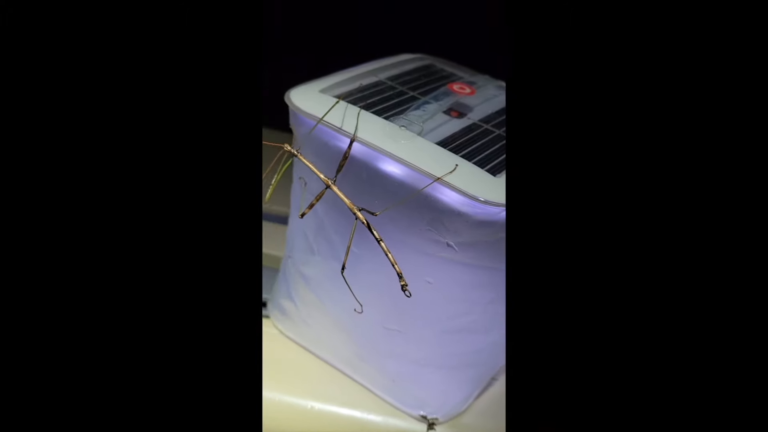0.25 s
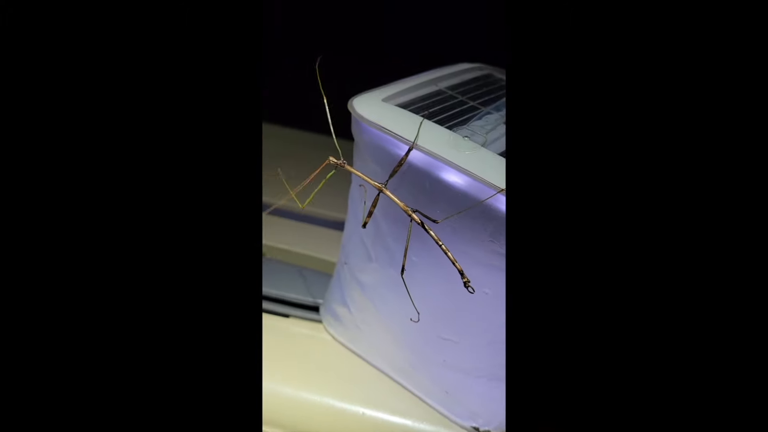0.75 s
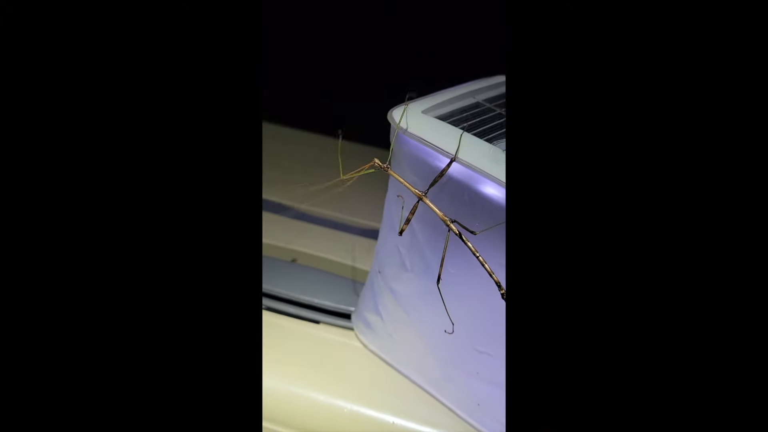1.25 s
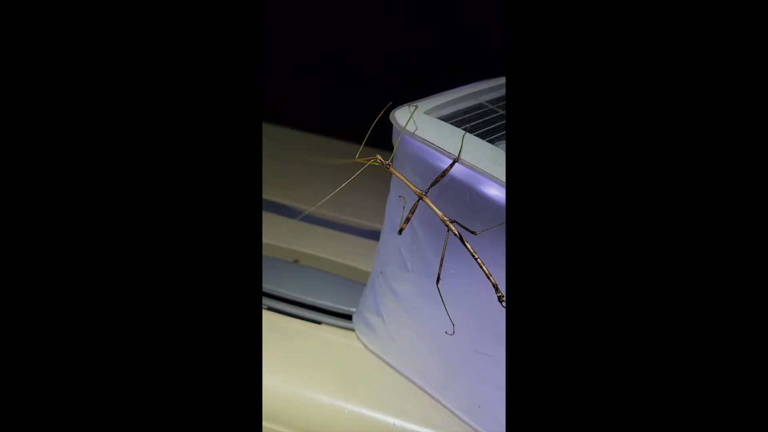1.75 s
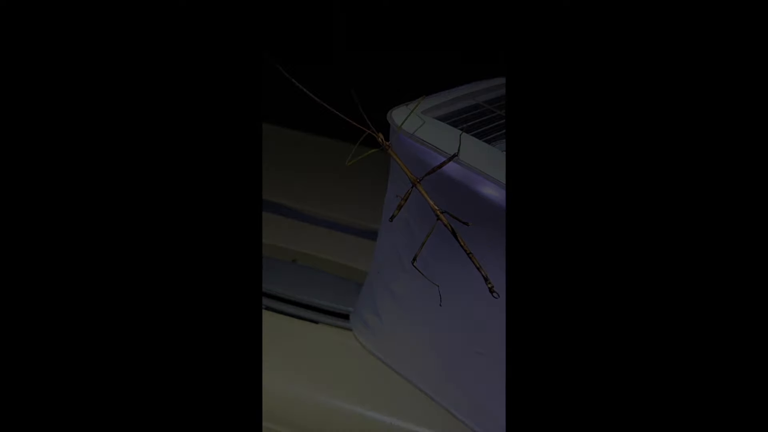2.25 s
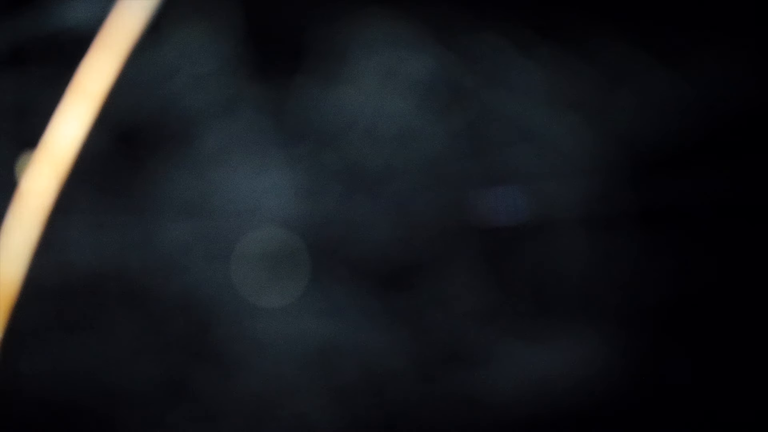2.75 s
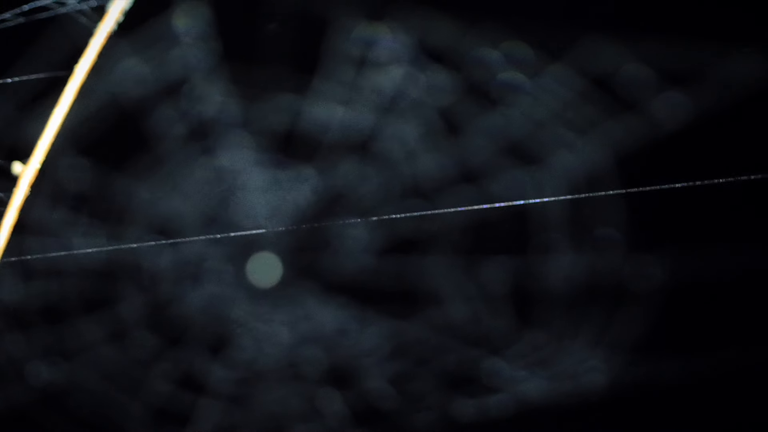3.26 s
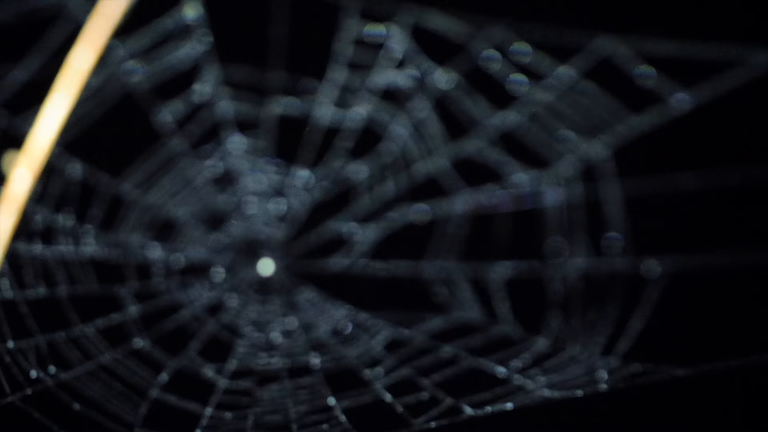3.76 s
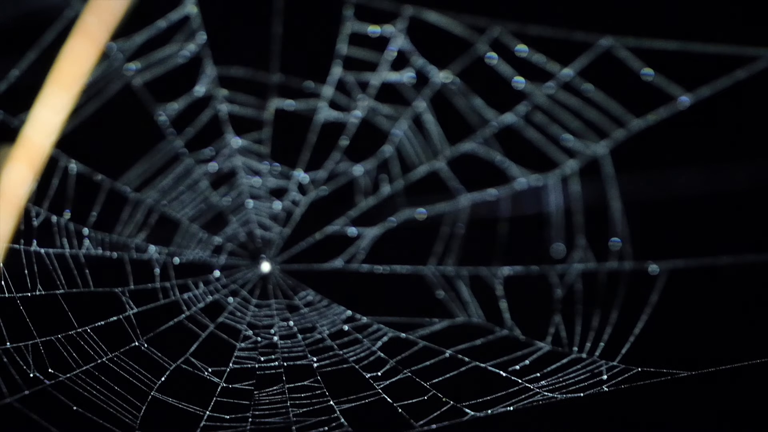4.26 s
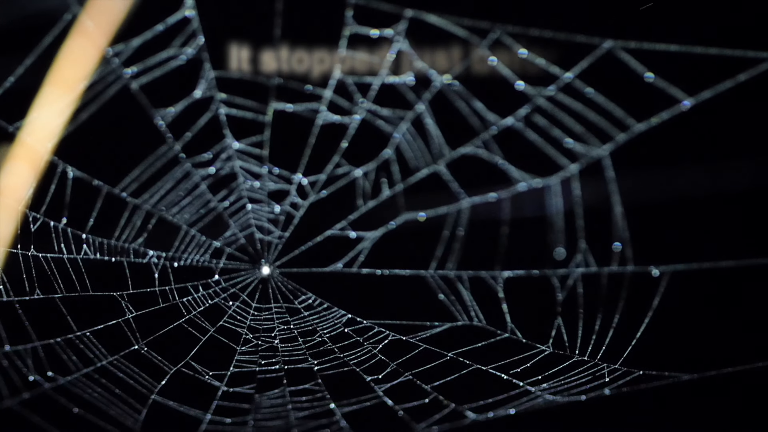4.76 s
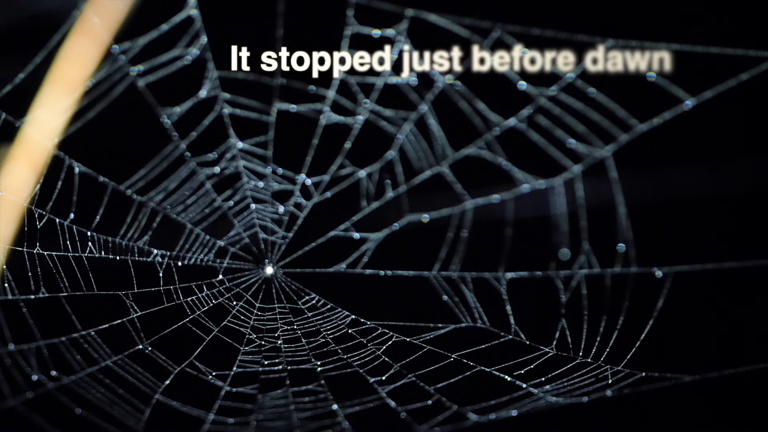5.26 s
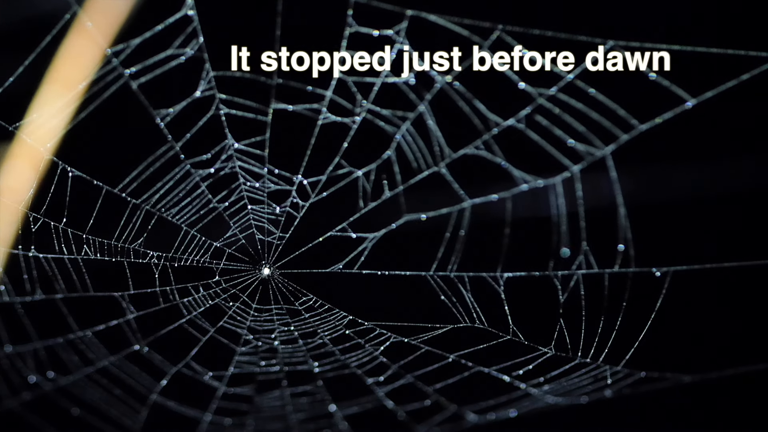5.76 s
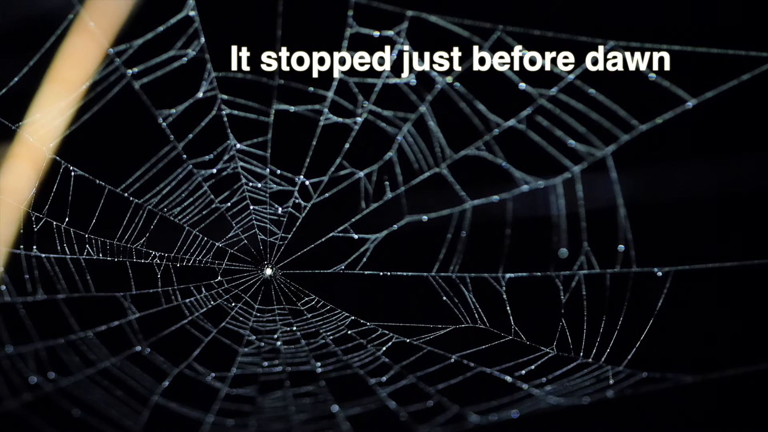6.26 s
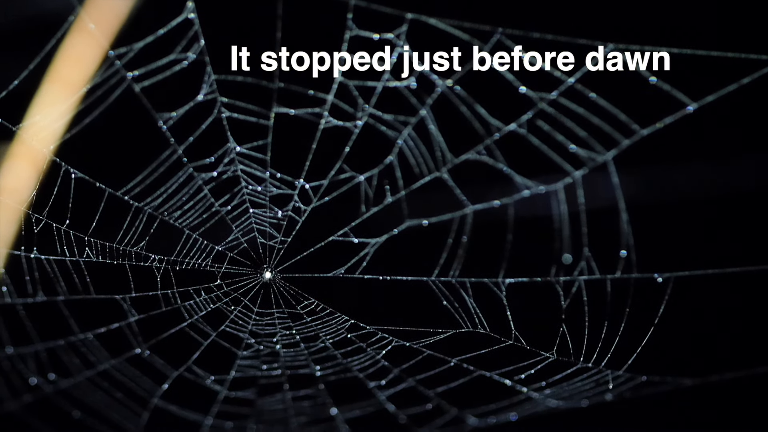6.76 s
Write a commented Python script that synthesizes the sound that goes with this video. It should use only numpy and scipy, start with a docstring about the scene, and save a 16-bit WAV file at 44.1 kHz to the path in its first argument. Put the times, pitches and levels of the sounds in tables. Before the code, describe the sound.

Inside a tent at night, heavy rain drums on the cloth, a dense muffled roar with big drops thudding overhead and small bright splashes. It starts loud, fades steadily from about one second and is gone by three and a half. A distant, high, steady insect chorus is left, very quiet, with faint air and soft drips. Close, wide stereo rain; centred night background.

```python
"""Heavy rain drums on a tent at night, heard from inside by two microphone ports, and fades away.
Random drops and placed thuds excite a cloth filter; splashes are short bursts of bright noise.
A far chorus of night insects, built of many short tones, comes up under it and stays, alike in both
ports, with faint air of filtered noise, a few soft drips (a push and two noise puffs) and a low hum
of narrow-band noise that comes and goes."""
import sys
import numpy as np
from scipy import signal
from scipy.fft import rfft, irfft, next_fast_len
from scipy.io import wavfile
from scipy.ndimage import uniform_filter1d, map_coordinates

SR = 44100
rng = np.random.default_rng(int(sys.argv[2]) if len(sys.argv) > 2 else 0)


def store_wav(level_fs):
    """Save 16-bit WAV to argv[1]."""
    pcm = np.round(np.clip(np.atleast_2d(level_fs), -1, 1) * 32767)
    wavfile.write(sys.argv[1], SR, pcm.T.astype(np.int16))


N = 309141
FFT_SIZE = 2 * next_fast_len(N // 2 + 8192)  # padded so that filter tails do not wrap

# colour of the drumming cloth: (frequency [Hz], density [dB per Hz])
CLOTH_SPECTRUM = [(25, -29.5), (47, -29), (64, -14.5), (140, -16.5), (220, -9.5), (300, -1.5), (370, -2),
                  (450, -0.5), (550, 0), (800, -0.5), (1250, -1.5), (1800, -8), (3000, -11), (4800, -15.5),
                  (6000, -24), (7700, -25), (8500, -33.5), (10800, -35.5), (12700, -30.5), (15500, -38)]
# balance of the ports: (frequency [Hz], left minus right [dB])
PORT_BALANCE = [(130, -.7), (200, 2), (270, 0), (400, -6), (600, 0), (800, 1), (1300, -3), (2200, -4),
                (2900, -1), (4700, -2.5), (7000, 7), (9500, 3), (12000, -1.5)]
# likeness of the ports: (frequency [Hz], likeness [0-1])
PORT_LIKENESS = [(100, .96), (300, .95), (410, .6), (550, .85), (830, .52), (1200, .75), (1500, .6),
                 (1900, .15), (3100, .25), (4000, .05)]
# phase between the ports: (frequency [Hz], lead of the left [rad])
PORT_LEAD = [(100, .2), (310, .4), (400, 1.1), (520, 2.7), (900, 2.4), (1500, 2.9), (2200, 2.2),
             (3100, 3.1)]
# big drops right overhead: (time [s], level before drive and cloth [dB], panel pitch [Hz])
BIG_DROPS = [(0.005, -14, 555), (0.014, -29.5, 690.0), (0.027, -17.5, 570.0), (0.089, -20, 610),
             (0.108, -27, 830.0), (0.151, -17, 650), (0.242, -13, 695), (0.267, -11, 614),
             (0.282, -13.5, 660.0), (0.297, -16, 870.0), (0.334, -15.5, 630.0), (0.464, -12, 610.0),
             (0.523, -16, 730.0), (0.541, -13.5, 580.0), (0.631, -19, 640.0), (0.67, -17.5, 630.0),
             (0.682, -13, 655), (0.762, -21, 560.0), (0.779, -14, 587), (0.837, -13.5, 567),
             (0.895, -11, 620.0), (1.071, -22.5, 780.0), (1.119, -19, 680.0), (1.206, -15.5, 544),
             (1.235, -18.5, 680.0), (1.352, -21, 660.0), (1.386, -17.5, 690.0), (1.415, -17, 600.0),
             (1.47, -18.5, 690), (1.526, -22, 510.0), (1.564, -16, 716), (1.613, -15.5, 710),
             (1.63, -15, 720.0), (1.701, -14, 615), (1.732, -17.5, 540.0), (1.742, -23, 740.0),
             (1.892, -13, 655), (1.979, -21, 650.0), (2.036, -15, 535), (2.097, -19.5, 770.0),
             (2.182, -20, 657), (2.194, -18.5, 610.0), (2.274, -20, 536), (2.32, -16.5, 765),
             (2.387, -16, 700), (2.412, -16.5, 960), (2.619, -21.5, 650.0), (2.634, -27.5, 620.0),
             (2.822, -17.5, 770.0), (2.856, -26.5, 480.0), (2.914, -39, 920.0), (3.063, -18.5, 970),
             (3.085, -34, 750.0), (3.092, -35, 660.0), (3.116, -32, 840.0), (3.213, -32, 600.0),
             (3.242, -42, 575), (3.268, -42, 720.0)]
# drops bursting into spray close by:
# (time [s], spray before filter [dB], left minus right [dB], fizz before filter [dB])
SPLASH_EVENTS = [(0.0912, -29.5, 7.5, -52), (0.137, -32.5, -1, -36), (0.536, -43, -6, -49.5),
                 (0.6065, -31.5, 0, -51.5), (0.665, -32, 3.5, -35.5), (1.1558, -31, 1.5, -49.5),
                 (1.37, -33, 0.5, -41), (1.484, -38, -4.5, -50.5), (1.692, -40.5, 2.5, -39.5),
                 (1.7537, -23.5, 3.5, -39.5), (2.0847, -30.5, -3, -52.5), (2.134, -36, 0, -44),
                 (2.394, -35, -1.5, -48)]
# spray filter: (frequency [Hz], gain [dB])
SPRAY_SPECTRUM = [(2500, -30), (4000, 6.5), (7000, -2), (9500, -15.5), (16000, -21.5)]
# fizz filter: (frequency [Hz], gain [dB])
FIZZ_SPECTRUM = [(6000, -27), (9000, -2), (16000, 1.5)]
# insect swell, used relative to its mean: (time [s], level [dB])
CHORUS_SWELL = [(3.45, -56.5), (3.7, -56.5), (4.0, -59), (4.2, -57.5), (4.4, -58), (4.65, -59),
                (4.9, -56.5), (5.05, -55.5), (5.22, -54), (5.45, -58.5), (5.8, -60), (6.0, -56),
                (6.42, -57.5), (6.55, -61.5), (6.68, -54.5), (7.0, -54.5)]
# wing strokes: (pitch [Hz], pitch scatter [Hz], level before swell and beat [dB], stroke length [cycles],
# strokes [1/s], share of the swell [ratio], beat depth [dB])
INSECT_KINDS = [(5320, 468, -52.5, 35, 5600, 0.22, 0.5), (4270, 200, -69.5, 30, 680, 2.3, 5),
                (10480, 350, -80, 55, 730, 0.35, 1), (2123, 103, -65.5, 27, 900, 1.16, 2.5),
                (2564, 114, -59.5, 45, 1400, .2, 0.3), (3117, 260, -63.5, 31, 1600, 1.3, 2)]
# offset of the chorus beat: (time [s], ahead of the even beat [s])
BEAT_LEAD = [(3.6, .033), (4.2, .055), (4.7, 0)]
# night air: (frequency [Hz], density before levelling [dB per Hz])
AIR_SPECTRUM = [(20, 11.5), (50, 9), (80, -9), (250, -1), (1500, -0.5), (3800, 6), (6500, 1), (7500, -7),
                (9500, -8.5), (15500, -8)]
# hum: (frequency [Hz], density before levelling [dB per Hz])
HUM_SPECTRUM = [(70, -28.5), (100, -6.5), (135, 0), (170, -8), (220, -33)]
# hum at full level, edges outside: (time [s], length [s], level added to the rest [dB])
HUM_EVENTS = [(3.522, 0.13, -76.5), (3.873, .04, -67), (4.2, .22, -84.5), (4.823, .09, -71.5),
              (4.967, .2, -78.5), (5.634, .2, -77.5), (6.05, 0.073, -76), (6.621, .15, -73),
              (6.843, .17, -77.5)]
# soft drips: (time [s], push peak [dB], bright puff [dB re push], dull puff before halving [dB re push])
DRIP_EVENTS = [(3.63, -58, -4.5, -11), (3.825, -59, 1, -9), (4.124, -62, 2, -9), (4.23, -58, -9, -9),
               (4.759, -59, -11, -1), (4.776, -56, -8.5, -6), (4.836, -54.5, -3, -4), (5.018, -56, -1, -5),
               (5.146, -46.5, -19, -18), (5.266, -61, -1, 0), (5.472, -61, -14, 4.5),
               (5.623, -58, -14.5, -4), (6.064, -54.5, -3, -9), (6.184, -56, -4, -4), (6.217, -65, -10, -5),
               (6.777, -64, -9, -8), (6.891, -58, -5, -5)]

HEAVY_DB, FINE_DB = -24, -25  # drop streams before the cloth
RAIN_ENDS_S, HEAVY_FADE_S, FINE_FADE_S = 3.427, 2.395, 2.39
FADE_EXPONENT = 0.95
GUST_DB, HEAVY_STIR_DB, FINE_STIR_DB = 0.34, 0.87, -0.12  # shared swell, then each stream's own
CROSSOVER_HZ = 1500  # heavy drops below, fine above
THUD_DRIVE_DB, THUD_T60_S = -5.5, 0.0084
SHEET_HZ, SHEET_DB, SHEET_T60_S = 338, 4, 0.022  # level re a panel at the sheet's pitch
SHEET_LOSS_DB_PER_OCT = 12  # by which the panel rings above the sheet
NIGHT_FROM_S, NIGHT_RISE_S = 1.9, 0.6
BEAT_HZ, BEAT_CREST_S = 7.3, 4.845
THROB_DB, KIND_THROB_DB = 0.75, 0.17  # all singers together, then each kind alone
AIR_DB, AIR_FOLLOWS, AIR_FLICKER_DB = -60, 0.28, 1.8  # level, share of the swell, own wobble
HUM_EDGE_S, HUM_REST_DB = 0.025, -84
TOP_HZ = 15720


def amp(db):
    """Gain of a dB value."""
    return 10 ** (np.asarray(db) / 20)


def unit(x):
    """x at rms 1."""
    return x / np.sqrt(np.mean(x ** 2) + 1e-20)


def along(points, hz):
    """(Hz, value) points interpolated on a log axis."""
    f, v = np.transpose(points)
    return np.interp(np.log(hz + 1), np.log(f + 1), v)


def curve(points):
    """(s, value) points interpolated to one value per sample."""
    s, v = np.transpose(points)
    return np.interp(np.arange(N) / SR, s, v)


def ramp(start_s, length_s):
    """Rises evenly from 0 to 1."""
    return np.clip((np.arange(N) / SR - start_s) / length_s, 0, 1)


def wobble(knots_per_s):
    """A smooth random curve through normally distributed knots."""
    return map_coordinates(rng.standard_normal(N // 100), [np.arange(N) * knots_per_s / SR])


def filtered(x, response):
    """x times a complex response of frequency."""
    hz = np.fft.rfftfreq(FFT_SIZE, 1 / SR)
    return irfft(rfft(x, FFT_SIZE) * response(hz), FFT_SIZE)[..., :N]


def coloured(x, points):
    """x through a zero-phase filter given as (Hz, dB) points."""
    return filtered(x, lambda hz: amp(along(points, hz)))


def causal(points, hz):
    """Minimum-phase response of a spectrum: it rings only after the blow."""
    cepstrum = irfft(np.log(amp(along(points, hz))))
    cepstrum[1:len(hz) - 1] *= 2
    cepstrum[len(hz):] = 0
    return np.exp(rfft(cepstrum))


def patchy(x, depth_db, size=512):
    """Random gain in time-frequency patches; a larger window makes them narrower and longer."""
    z = signal.stft(x, nperseg=size)[2]
    field = rng.standard_normal(z.shape[-2:])
    field = uniform_filter1d(field, size=3, axis=0)
    field = uniform_filter1d(field, size=8, axis=1)
    return signal.istft(z * amp(depth_db * unit(field)), nperseg=size)[1][..., :N]


def rain():
    """Heavy drops drive the low range, fine ones patter above; gusts stir both."""
    def fade(length_s):
        return (1 - ramp(RAIN_ENDS_S - length_s, length_s)) ** FADE_EXPONENT

    def heavy_share(hz):
        return 1 / (1 + (hz / CROSSOVER_HZ) ** 4)

    gust_db = GUST_DB * wobble(6.83)
    heavy_gain = fade(HEAVY_FADE_S) * amp(HEAVY_DB + gust_db + HEAVY_STIR_DB * wobble(21.07))
    fine_gain = fade(FINE_FADE_S) * amp(FINE_DB + gust_db + FINE_STIR_DB * wobble(16.0))
    heavy = heavy_gain * patter(per_s=800, spread_db=3.0, blur=0.18)
    fine = fine_gain * patter(per_s=4000, spread_db=4.0, blur=0.55)
    blows = filtered(heavy, lambda hz: np.sqrt(heavy_share(hz)))
    blows += filtered(fine, lambda hz: np.sqrt(1 - heavy_share(hz)))
    shared, apart = patchy(blows, depth_db=1.5) + thuds() * [[1], [.4]]
    return cloth(shared, apart)


def patter(per_s, spread_db, blur):
    """Two streams of drops of random size; a share of far drops blurs into noise."""
    falls = rng.random((2, N)) < per_s / SR
    drops = unit(falls * amp(spread_db * rng.standard_normal((2, N))))
    noise = rng.standard_normal((2, N))
    return np.sqrt(1 - blur) * (drops - drops.mean()) + np.sqrt(blur) * noise


def thuds():
    """A big drop lands softly and rings the nearest panel and the whole sheet for a few cycles."""
    out, t = np.zeros(N), np.arange(SR // 40) / SR
    onset = 1 - np.exp(-t / .0007)
    for s, db, hz in BIG_DROPS:
        drive_db = db + THUD_DRIVE_DB
        sheet_db = drive_db + SHEET_DB - SHEET_LOSS_DB_PER_OCT * np.log2(hz / SHEET_HZ)
        panel = amp(drive_db - 60 * t / THUD_T60_S) * np.sin(2 * np.pi * hz * t)
        sheet = amp(sheet_db - 60 * t / SHEET_T60_S) * np.sin(2 * np.pi * SHEET_HZ * t)
        out[round(s * SR - 30):][:len(t)] += (panel + sheet) * onset
    return out


def cloth(shared, apart):
    """Cloth colours the blows; one part reaches both ports phase-shifted, one with opposite signs."""
    hz = np.fft.rfftfreq(FFT_SIZE, 1 / SR)
    turn = np.arccos(np.clip(along(PORT_LIKENESS, hz), 0, 1)) / 2
    shift = np.exp(.5j * along(PORT_LEAD, hz)) * amp(along(PORT_BALANCE, hz) / 2)
    level = np.sqrt(len(hz)) / np.linalg.norm(amp(along(CLOTH_SPECTRUM, hz)))
    ports = level * causal(CLOTH_SPECTRUM, hz) * np.array([shift, 1 / shift])
    common = filtered(shared, lambda _: ports * np.cos(turn))
    opposed = filtered(apart, lambda _: ports * np.sin(turn) * [[1], [-1]])
    return common + opposed


def splashes():
    """Each is a short burst of bright noise with a finer fizz on top."""
    t = np.arange(SR // 10) / SR
    spray, fizz = np.zeros((2, 2, N + SR))
    onset = 1 - np.exp(-t / .0012)
    for s, spray_db, pan_db, fizz_db in SPLASH_EVENTS:
        pan = amp([[pan_db / 2], [-pan_db / 2]])
        for layer, db, t60_s in ((spray, spray_db, .078), (fizz, fizz_db, .06)):
            burst = amp(db - 60 * t / t60_s) * onset * rng.standard_normal((2, len(t)))
            layer[:, round(s * SR):][:, :len(t)] += pan * burst
    return coloured(spray[:, :N], SPRAY_SPECTRUM) + coloured(fizz[:, :N], FIZZ_SPECTRUM)


def night():
    """Insects, air, hum and drips, from one direction: the same signal in both ports."""
    level_db = curve(CHORUS_SWELL)
    swell_db = level_db - level_db.mean()
    background = chorus(swell_db) + air(swell_db) + hum()
    return ramp(NIGHT_FROM_S, NIGHT_RISE_S) * background + drips()


def chorus(swell_db):
    """All singers throb together, with random patches of gain."""
    throb = amp(THROB_DB * wobble(12))
    return throb * patchy(singers(swell_db), depth_db=2.8, size=2048)


def singers(swell_db):
    """Overlapping wing strokes, each a short soft-edged tone; each kind has its share of swell and beat."""
    out, start = np.zeros(N), NIGHT_FROM_S * SR
    beat_time = np.arange(N) / SR + curve(BEAT_LEAD) - BEAT_CREST_S
    beat = np.cos(2 * np.pi * BEAT_HZ * beat_time)
    for hz, scatter_hz, db, cycles, per_s, follows, beat_db in INSECT_KINDS:
        count = round(per_s * (N - start) / SR)
        when, phase = rng.random((2, count))
        size, off = rng.standard_normal((2, count))
        k = np.arange(round(cycles * SR / hz))
        pitch_hz = hz + scatter_hz * 2 * np.tanh(off / 2)  # bounded at twice the scatter
        tone = np.sin(2 * np.pi * (pitch_hz[:, None] * k / SR + phase[:, None]))
        envelope = np.sin(np.pi * k * hz / (cycles * SR)) ** 2
        strokes = amp(.6 * size)[:, None] * envelope * tone
        at = (start + when * (N - start)).astype(int)[:, None] + k
        kind = np.bincount(at.ravel(), strokes.ravel(), N + SR)[:N]
        gain_db = db + follows * swell_db + beat_db * beat + KIND_THROB_DB * wobble(8)
        out += amp(gain_db) * kind / np.std(kind[round(start):])
    return out


def air(swell_db):
    """Faint coloured noise that partly follows the chorus swell and flickers."""
    noise = unit(coloured(rng.standard_normal(N), AIR_SPECTRUM))
    gain = amp(AIR_DB + AIR_FOLLOWS * swell_db + AIR_FLICKER_DB * wobble(19))
    return gain * patchy(noise, depth_db=1.5)


def hum():
    """Narrow low noise; each hum swells in and out over a faint steady rest."""
    level = np.full(N, amp(HUM_REST_DB))
    for s, length_s, db in HUM_EVENTS:
        rise = ramp(s - HUM_EDGE_S, HUM_EDGE_S)
        fall = ramp(s + length_s, HUM_EDGE_S)
        level += amp(db) * (rise - fall)
    return level * unit(coloured(rng.standard_normal(N), HUM_SPECTRUM))


def drips():
    """A soft push of about a millisecond, a tiny bright puff and a longer dull one."""
    out, t = np.zeros(N + SR), np.arange(SR // 10) / SR
    push = -np.exp(-((t - .001) / .00022) ** 2) + .4 * np.exp(-((t - .0014) / .00055) ** 2)
    push /= np.abs(push).max()
    for s, db, puff_db, dull_db in DRIP_EVENTS:
        puff = amp(puff_db - 60 * t / .03) * rng.standard_normal(len(t))
        low = uniform_filter1d(rng.standard_normal(len(t)), size=16)
        low = uniform_filter1d(low, size=12)
        band = unit(low - uniform_filter1d(low, size=120))  # slowest part removed
        dull = amp(dull_db - 60 * t / 0.1) * band
        out[round(s * SR):][:len(t)] += amp(db) * (push + puff + dull / 2)
    return out[:N]


def scene():
    """Rain on the cloth over the night outside."""
    return rain() + splashes() + night()


def record(dry):
    """The recorder keeps nothing above its band limit."""
    return filtered(dry, lambda hz: hz < TOP_HZ)


dry = scene()
out = record(dry)
store_wav(out)
```